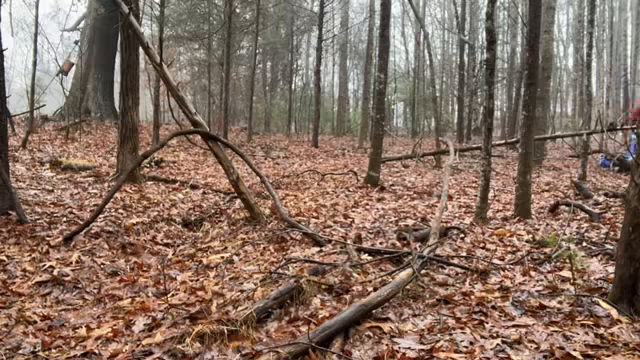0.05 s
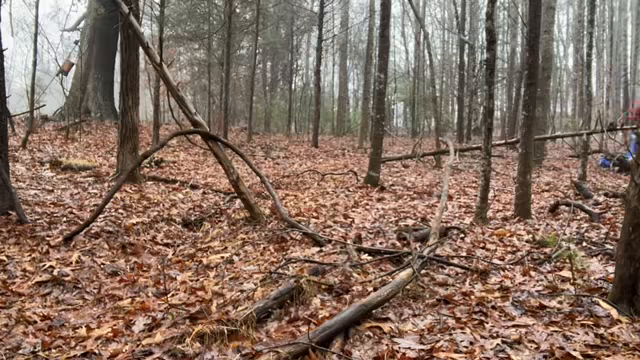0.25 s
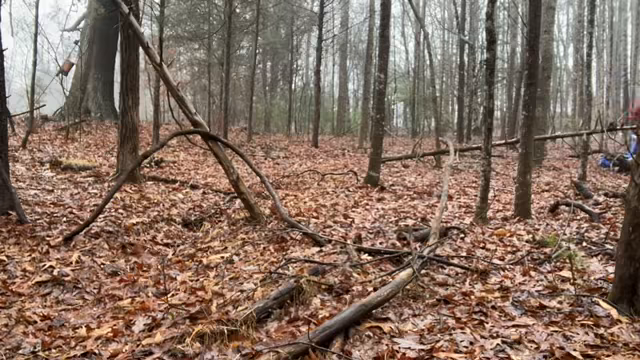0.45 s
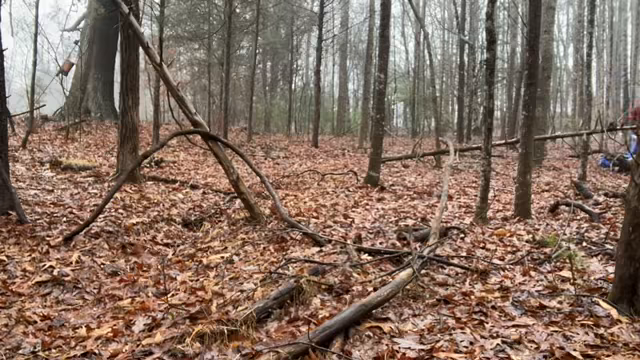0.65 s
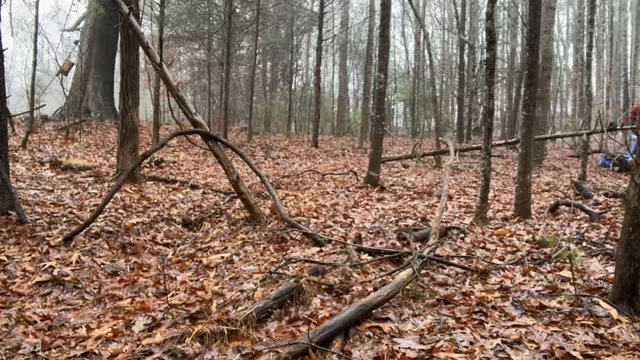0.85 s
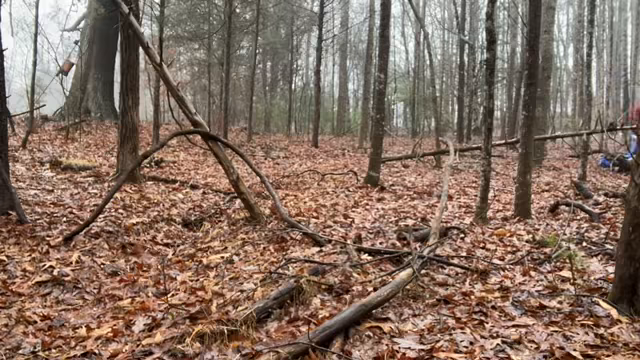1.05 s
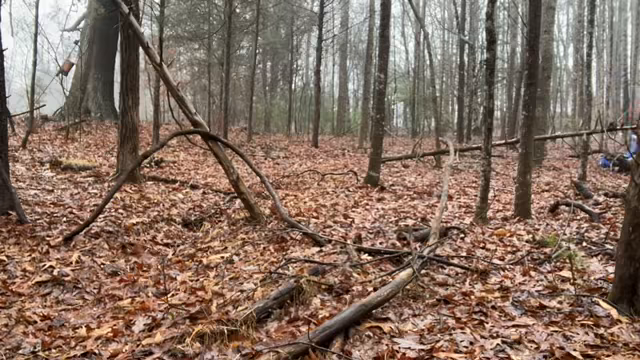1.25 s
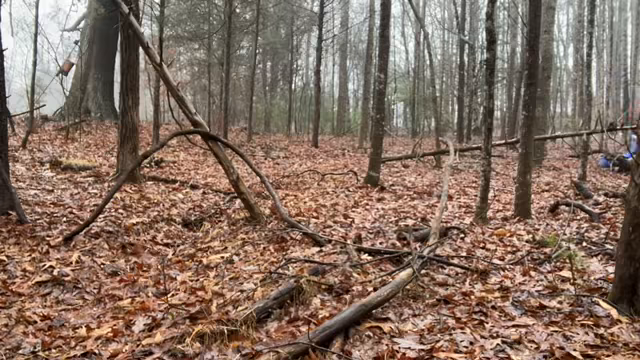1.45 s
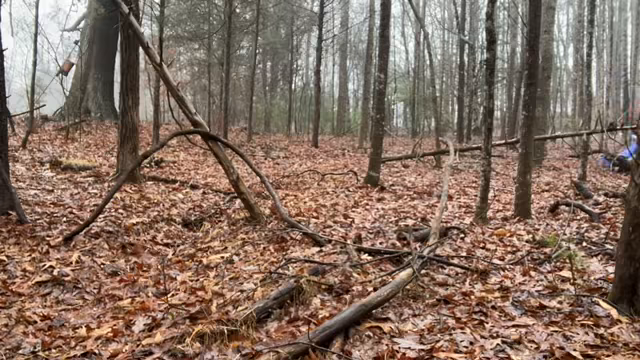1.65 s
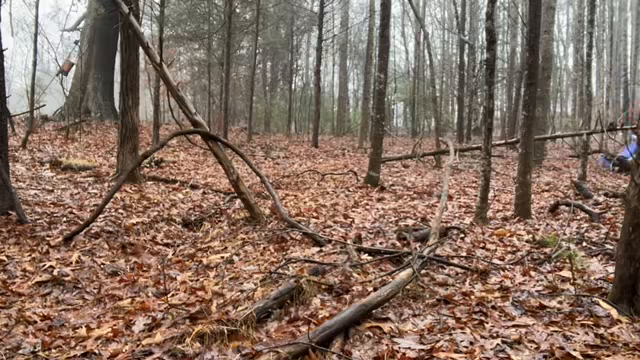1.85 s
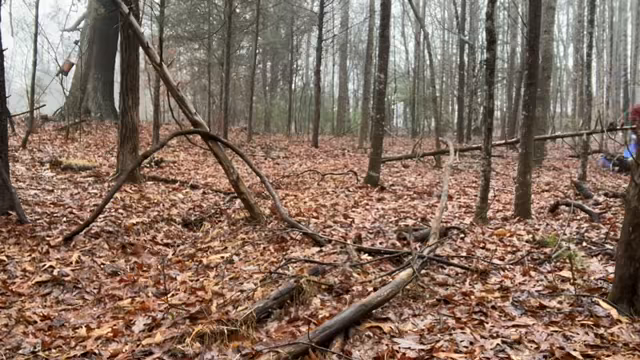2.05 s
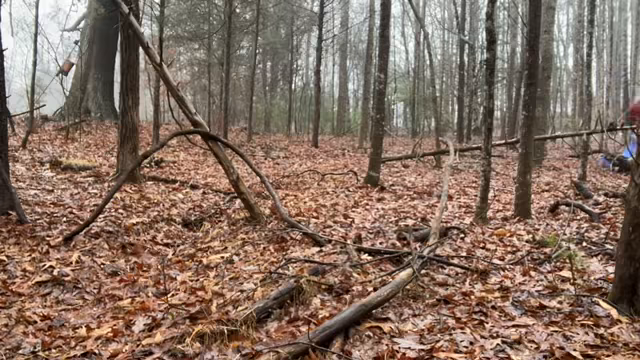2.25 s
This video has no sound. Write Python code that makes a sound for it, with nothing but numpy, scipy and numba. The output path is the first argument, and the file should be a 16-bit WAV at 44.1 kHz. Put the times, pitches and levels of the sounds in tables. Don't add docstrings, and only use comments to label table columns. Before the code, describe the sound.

Rain falls steadily on dry fallen leaves, with crisp single drops ticking close by

```python
import sys
import numpy as np
from scipy import signal
from scipy.fft import rfft, irfft
from scipy.io import wavfile
from scipy.ndimage import uniform_filter1d
from numba import njit

SR = 44100
rng = np.random.default_rng(int(sys.argv[2]) if len(sys.argv) > 2 else 0)


def log_audio(samples):
    frames = np.atleast_2d(samples).T
    limited = np.clip(frames, -1, 1)
    pcm = np.round(limited * 32767).astype(np.int16)
    wavfile.write(sys.argv[1], SR, pcm)


def volts_from_db(level):
    exponent = np.asarray(level, float) / 20
    return 10 ** exponent


N = 99225
PORT_LAG_MS = 0.454

# [f/Hz, level/dB]
HISS_COLOUR = [(150, 7.5), (400, 4), (900, 1), (2500, -7.5), (6000, -8), (15000, -7.5)]
# [f/Hz, level/dB]
RUMBLE_COLOUR = [(20, -47), (40, -4.5), (65, 5), (100, 5), (140, -7.5), (240, -9), (400, -36.5)]
# [f/Hz, level/dB]
RUMBLE_SIDE_COLOUR = [(20, -36), (40, -17), (65, -7), (100, -6), (140, -4), (240, -9), (400, -22)]
# [t/s, level/dB]
RUMBLE_LEVEL = [
    (0.0, -48),
    (0.21, -50),
    (1.05, -50.5),
    (1.16, -46),
    (1.3, -48),
    (1.85, -50.5),
    (1.93, -44),
    (2.05, -54.5),
    (2.2, -45),
]
# [t/s, peak level/dB,
# f/Hz, length/cycles]
LOW_THUDS = [(.015, -39, 204.4, 2.3), (.2054, -38, 656, 1.6), (1.012, -31, 284, 1.26),
             (1.123, -30.5, 180, 1.15), (1.3983, -23, 288, 0.91), (1.3991, -18.5, 1058, 7.1),
             (1.4002, -22.5, 840, 4.7), (1.4001, -22.5, 81, 1.7), (1.8973, -42.5, 280, 5.2),
             (1.5493, -33, 740, 4.7), (2.1099, -36, 427, 2.9)]
# [t/s, peak level/dB, f/Hz, length/cycles]
LEAF_RATTLES = [(0.2073, -22, 1490, 3.8), (.2065, -26, 8050, 16), (0.209, -37, 4000, 11),
                (0.3727, -37.5, 1890, 2.5), (0.452, -29.5, 1500, 3.3), (0.5087, -24.5, 5940, 4.1),
                (0.6544, -32, 1100, 1.4), (.6606, -25, 3940, 2.5), (.6608, -40, 6900, 5.8),
                (.6635, -43, 8200, 9), (0.6923, -31, 2600, 3), (.956, -29, 2050, 2), (1.204, -51, 6000, 6),
                (1.23, -34, 1170, 2.3), (1.2937, -29, 4130, 3.6), (1.3175, -35, 4940, 5),
                (1.3982, -13.5, 1880, 1.45), (1.3994, -14, 3820, 6.7), (0.136, -28, 4600, 5.3),
                (1.9603, -30, 2260, 1.7), (2.1863, -28, 1206, 3.2), (0.5263, -16, 4600, 5),
                (1.9609, -28.5, 4480, 3.2), (1.167, -38.5, 3250, 6.9), (1.0663, -26.5, 9400, 7),
                (1.273, -28.5, 8200, 4.9), (2.15, -35, 3530, 5.7), (1.4028, -28, 2190, 2.3),
                (1.4614, -29, 5070, 4), (1.5983, -20, 3700, 3.3), (1.599, -33, 2200, 5),
                (1.652, -35, 1080, 3.1), (1.7468, -29, 1840, 1.1), (1.7513, -34.5, 3930, 4.7),
                (1.752, -30, 6100, 7), (1.758, -22, 4550, 1.7), (1.759, -23, 7800, 5),
                (1.7587, -31, 810, 2), (1.7745, -32, 1200, 1.2), (1.775, -30, 6430, 15),
                (1.7792, -26, 8100, 6.1), (1.7825, -34, 2600, 4.9), (2.0682, -28, 2370, 2.1),
                (2.1535, -33, 4120, 6), (2.168, -26, 9200, 9.7), (2.1861, -27.5, 2350, 3.2)]
# [t/s, peak level/dB, knock f/Hz, low knock level/dB and
# tick level/dB, both relative to the peak]
SMALL_DROPS = [(0.135, -40, 4440, -34, -37), (0.238, -27.5, 5080, -26, -12), (0.264, -28.5, 790, -11, -8),
               (0.286, -26.5, 870, -29, -8.5), (0.438, -36, 780, -31, 1), (0.45, -22.5, 1430, -37, -10),
               (0.505, -42, 845, -32, 4), (0.547, -26, 840, -37, -9), (0.633, -31.5, 980, -9, -1),
               (0.729, -30.5, 800, -18, -3), (0.761, -26, 2000, -15, -34), (0.955, -24.5, 1870, -21, -17),
               (1.08, -26.5, 2180, -8, -4.5), (1.165, -38, 3250, -40, -28), (1.204, -37, 740, -28, 7),
               (1.229, -26.5, 1118, -38, -4), (1.316, -25.5, 2830, -7, -15),
               (1.651, -24.5, 960, -27, -12.5), (1.979, -26, 1410, -34, -22), (2.067, -34.5, 825, -8, -25),
               (2.1243, -21, 1210, -27, -38), (2.148, -24, 3910, -14, -9.5),
               (.5306, -26, 4000, -24, -12),
    (.5505, -29, 5000, -24, -10),
    (.583, -33, 4000, -22, -10),
    (.5931, -31, 3900, -22, -8),
    (.6625, -30, 3800, -24, -6),
    (1.0648, -34, 2500, -16, -3),
    (1.2857, -33, 7500, -22, -7),
    (1.3823, -33, 5200, -24, -8),
    (1.5053, -30, 6500, -24, -16),
    (2.168, -31, 4700, -22, -12),
               (1.012, -21, 1690, -4.5, -10),
    (1.108, -30.5, 2000, -9, -25),
    (1.293, -25, 1870, -11, -5),
]
# [t/s, peak level/dB, knock f/Hz, low knock level/dB and tick level/dB, both relative to the peak]
NEAR_DROPS = [(0.203, -3, 2820, -8, -14.5), (0.526, -18, 1080, -17, -17), (0.6598, -15, 1100, -22.5, -13.5),
              (0.69, -23.5, 1340, -47, -0.5), (0.983, -24.5, 2590, -10, -1), (1.007, -19.5, 1040, -29, -26),
              (1.46, -22.5, 4070, -24, -8), (1.494, -21.5, 2200, -5, -23), (1.5947, -11, 1280, -4.5, -7.5),
              (1.7464, -22.5, 910, -11, -11.5), (1.77, -21, 2330, -7.5, -3.5),
              (1.893, -27, 1200, -23, -0.5), (1.959, -16.5, 2350, -12, -18.5),
              (2.1864, -28.5, 1270, -36, -7.5),
              (0.55, -18.5, 5000, -22, -32),
    (1.3968, -11.5, 1790, -25, -17),
    (0.98, -24, 4200, -4, -29),
    (1.5812, -16.5, 3540, -12, -7),
]
# [left port lag/ms, left over right level/dB]
NEAR_PLACES = [(0, -.7), (.3, 5), (.23, -4), (.32, -2), (-.36, 0), (-.34, -1), (.45, 0), (-.05, 2),
               (-.11, .5), (-.07, 0), (-.14, -1.5), (.14, -2), (-.02, 0), (-.14, 1.5), (.3, 4), (-.3, -1),
               (-.3, -1), (-.12, -3)]
# [f/Hz, level/dB]
LEAF_COLOUR = [(4200, 0), (4800, -10), (6400, -15), (7200, 1)]
# [f/Hz, level/dB]
MID_COLOUR = [(700, -0.5), (4500, 5.5), (5900, -0.5), (7800, 0.5), (9500, 0.5), (13500, -4)]
# [f/Hz, level/dB]
MID_GAP = [(9600, -2), (10000, -15), (10900, -14), (11500, -2)]
# [f/Hz, level/dB]
SIDE_COLOUR = [(1000, -2.5), (3000, 3.5), (7000, -3.5), (9000, -2.5), (11500, -3.5), (14200, -5)]
# [f/Hz, level/dB]
SIDE_GAP = [(7400, 0), (7900, -16), (8500, -14), (8900, 0), (11900, 0), (12400, -22), (13500, -22),
            (14000, 0)]
# [f/Hz, level/dB]
TOP_COLOUR = [(14300, 2), (14700, -10), (16300, -14)]


def set_level(x, db):
    return x * volts_from_db(db) / np.sqrt(np.mean(x ** 2))


def colour(x, table):
    hz, db = np.array(table, float).T
    grid = np.linspace(1, SR / 2, 4097)
    log_gain = np.log(volts_from_db(np.interp(np.log(grid), np.log(hz), db)))
    cepstrum = irfft(log_gain)
    cepstrum[1:4096] *= 2
    cepstrum[4097:] = 0
    response = irfft(np.exp(rfft(cepstrum)))
    return signal.fftconvolve(x, response)[:N]


def walk(rate):
    hold = int(SR / rate)
    steps = np.repeat(rng.standard_normal(N // hold + 1), hold)
    smooth = uniform_filter1d(uniform_filter1d(steps, hold), hold)
    return 1.3 * smooth[:N]


@njit
def ring(n, sr, at, hz, cycles, size, glide):
    y = np.zeros(n)
    for k in range(len(at)):
        i = int(at[k] * sr) + 1
        u = (i / sr - at[k]) * hz[k]
        while u < 3 * cycles[k] and i < n:
            e = 3 * u / cycles[k]
            if i >= 0:
                swing = np.sin(2 * np.pi * u * (1 + glide * u / cycles[k] / 2))
                y[i] += size[k] * e * np.exp(1 - e) * swing
            i += 1
            u += hz[k] / sr
    return y


def hiss():
    swell_db = 0.3 * walk(3.5)
    rain = 0
    for hz in 150 * 2 ** np.arange(0, 7.0):
        high = min(hz * 1.42, 17000) if hz < 9000 else 17000
        band = signal.butter(2, [hz / 1.42, high], "band", fs=SR, output="sos")
        noise = signal.sosfilt(band, rng.standard_normal((2, N)))
        flicker_db = 1 * walk(24.53)
        rain = rain + noise * volts_from_db(swell_db + flicker_db)
    return set_level(np.array([colour(x, HISS_COLOUR) for x in rain]), -43)


def rumble():
    mid = colour(rng.standard_normal(N), RUMBLE_COLOUR) * volts_from_db(1 * walk(9.33))
    side = colour(rng.standard_normal(N), RUMBLE_SIDE_COLOUR) * volts_from_db(1 * walk(9.33))
    ports = mid * volts_from_db(np.array([[-1.5], [1.5]])) + side * np.array([[1], [-1]])
    time, db = np.array(RUMBLE_LEVEL).T
    return ports / np.std(mid) * volts_from_db(np.interp(np.arange(N) / SR, time, db))


def scatter(x, db, t60):
    t = np.arange(SR // 4) / SR
    tail = rng.standard_normal((2, len(t))) * volts_from_db(-60 * t / t60)
    tail = tail * (t > 0.001)
    tail = tail * volts_from_db(db) / np.sqrt(np.sum(tail[0] ** 2))
    return signal.fftconvolve(x, tail, axes=1)[:, :N]


def thuds():
    at, db, hz, cycles = np.array(LOW_THUDS, float).T
    lag_ms, pan_db = 0.36, -8
    ports = []
    for side in (1, -1):
        start = at + side * lag_ms / 2000
        ports.append(ring(N, 1.0 * SR, start, hz, cycles, volts_from_db(db + side * pan_db / 2), -0.1))
    return np.array(ports)


def rattles():
    at, db, hz, cycles = np.array(LEAF_RATTLES, float).T
    lag = PORT_LAG_MS / 2000 * np.tanh(rng.standard_normal(len(at))) / 2
    ports = [ring(N, 1.0 * SR, at + side * lag, hz, cycles, volts_from_db(db), -0.1) for side in (1, -1)]
    return np.array(ports)


def drops(at, db, hz, low_db, tick_db, lag_ms, pan_db, count):
    tick_hz, tick_cycles = 7830, 4
    luck = rng.random((len(at), 2)).T
    grain = rng.random((len(at), 7, count)).transpose(1, 2, 0)
    splash_late, spray_late = -np.log(grain[0]), -np.log(grain[5])
    shift = 0.0002 * (grain[1] - 0.5)
    sign = np.sign(grain[4] - 0.5)
    grain_cycles = 2 * grain[3]
    one = np.ones(len(at))
    ports = []
    for side in (1, -1):
        start = at + 0.0012 + side * lag_ms / 2000
        peak_db = db + side * pan_db / 2
        tick = volts_from_db(peak_db + tick_db + 4.5)
        # start/s, pitch/Hz, length/cycles, size
        knock = (start + 0.0005, 1.16 * hz, 1.49 * one, -volts_from_db(peak_db))
        low_knock = (start + 0.001, 914 * (0.85 + 0.3 * luck[0]), 1.2 * one, volts_from_db(peak_db + low_db + 1))
        first_tick = (start, tick_hz * (0.9 + 0.2 * luck[1]), tick_cycles * one, tick)
        spray = (start + 0.0016 * spray_late + side * shift / 2,
                 tick_hz * 2 ** (0.4 * (3.5 * grain[6] - 0.5)),
                 tick_cycles + grain_cycles,
                 sign * tick * volts_from_db(-4 - 6 * spray_late))
        splash = (start + 0.003 * splash_late + side * shift,
                  2535 * 2 ** (0.55 * 2 * (2 * grain[2] - 1)),
                  1 + grain_cycles,
                  sign * volts_from_db(peak_db - 23 - 6 * splash_late))
        parts = (knock, low_knock, first_tick, spray, splash)
        begin, pitch, cycles, size = (np.concatenate([np.ravel(p[k]) for p in parts]) for k in range(4))
        pitch = np.clip(pitch, 400, 0.36 * SR)
        ports.append(ring(N, 1.0 * SR, begin, pitch, cycles, size, -0.25))
    return np.array(ports)


def patter(count):
    when, loud, angle = rng.random((count, 3)).T
    pitch, low, tick, pan = np.clip(rng.standard_normal((count, 4)).T, -2, 2)
    flurry_db = 2 * walk(30)[(when * N).astype(int)]
    db = -44.5 + np.minimum(-4.2 * np.log(loud), 11) + flurry_db
    hz = np.clip(2000 * 2 ** (0.91 * pitch), 250, 9000)
    lag_ms = PORT_LAG_MS * np.sin(2 * np.pi * angle)
    return drops(when * N / SR, db, hz, -43 + 4 * low, -7.5 + 3 * tick, lag_ms, 2 * pan, count=3)


def near_drops():
    big = np.array(NEAR_DROPS, float)
    near = drops(*big.T, *np.array(NEAR_PLACES, float).T, count=26)
    near = np.array([colour(x, LEAF_COLOUR) for x in near])
    small = np.array(SMALL_DROPS, float)
    direction, pan = rng.standard_normal((len(small), 2)).T
    return near + drops(*small.T, PORT_LAG_MS * np.tanh(direction), 2 * pan, count=16)


def scene():
    rain = near_drops() + patter(count=1100) + rattles()
    trees = scatter(rain, -34, t60=0.9)
    litter = scatter(rain, -16, t60=0.025)
    return rain + trees + litter + thuds() + hiss() + rumble()


def band_limit(x):
    return signal.sosfilt(signal.butter(12, 15840, fs=SR, output="sos"), x)


def record(dry):
    mid = colour(colour((dry[0] + dry[1]) / 2, MID_COLOUR), MID_GAP)
    side = colour(colour((dry[0] - dry[1]) / 2, SIDE_COLOUR), SIDE_GAP)
    ports = np.array([colour(x, TOP_COLOUR) for x in (mid + side, mid - side)])
    mix = np.clip(ports, -1, 1)
    return band_limit(mix)


dry = scene()
out = record(dry)
log_audio(out)
```